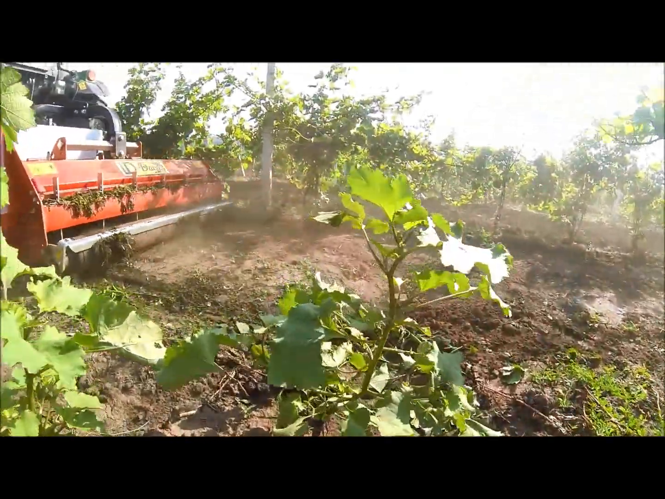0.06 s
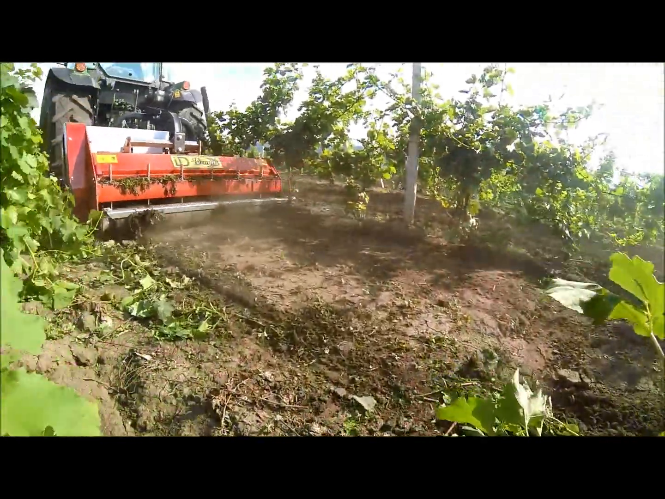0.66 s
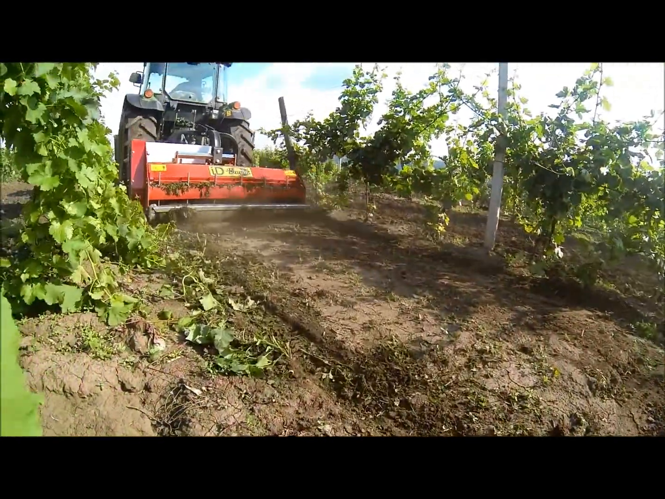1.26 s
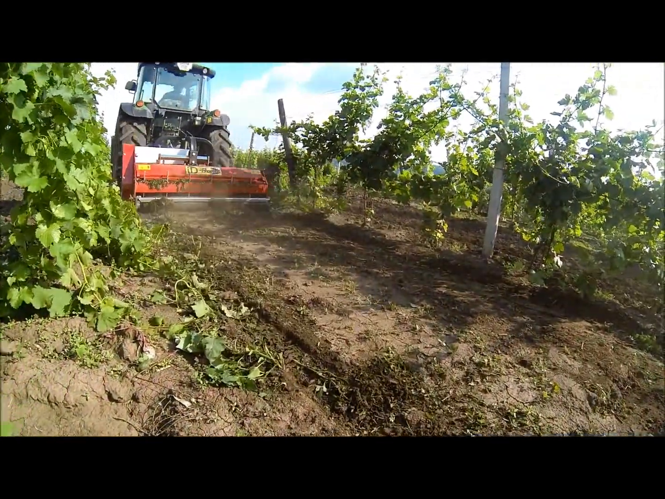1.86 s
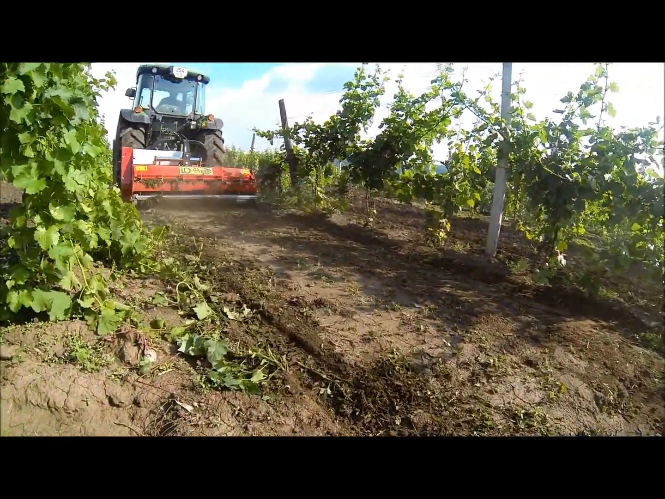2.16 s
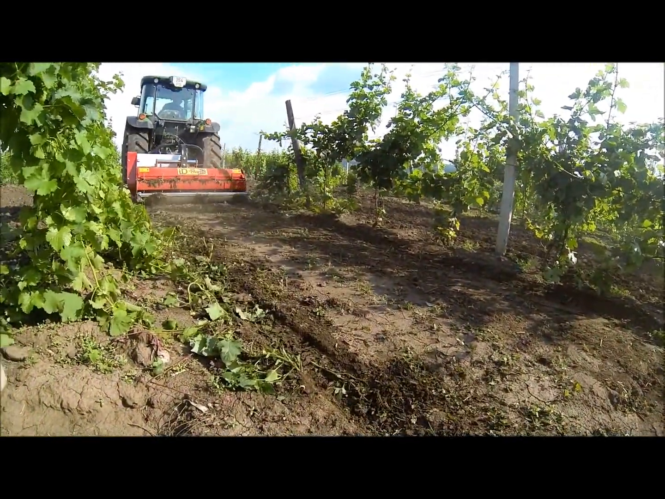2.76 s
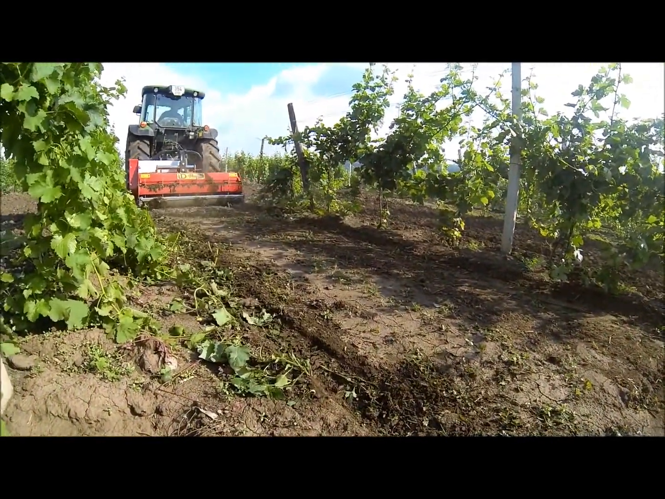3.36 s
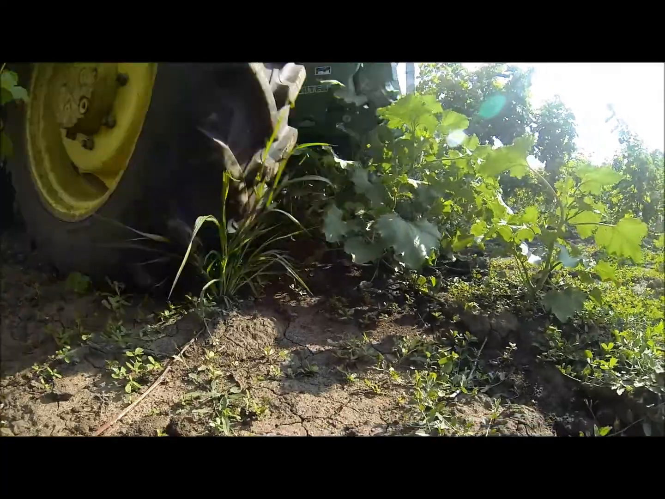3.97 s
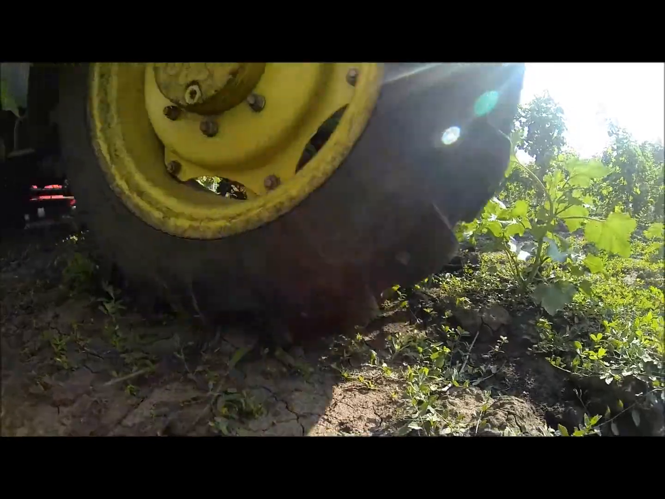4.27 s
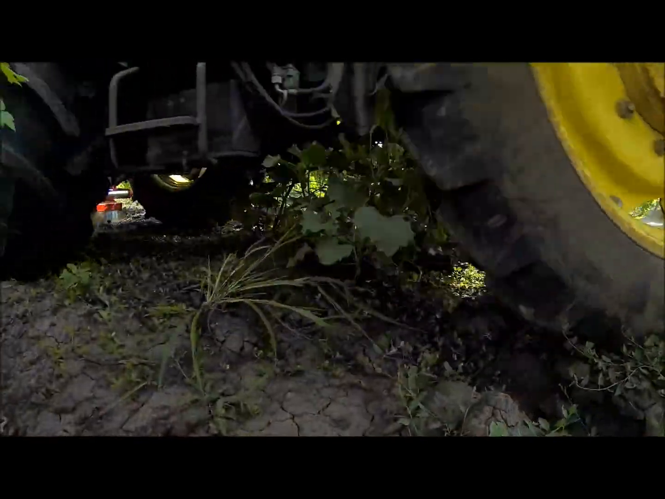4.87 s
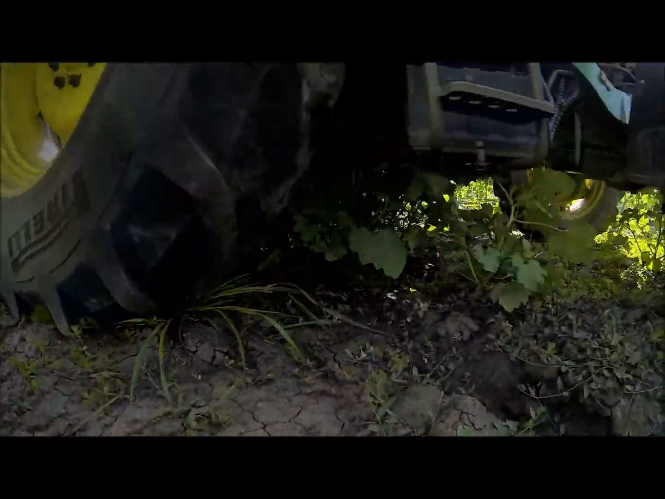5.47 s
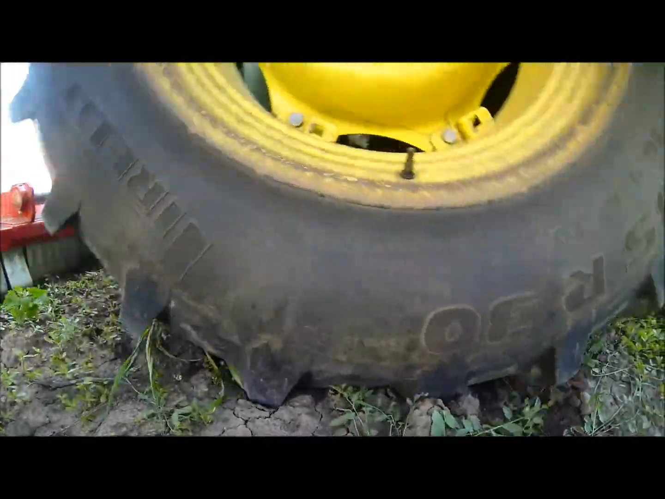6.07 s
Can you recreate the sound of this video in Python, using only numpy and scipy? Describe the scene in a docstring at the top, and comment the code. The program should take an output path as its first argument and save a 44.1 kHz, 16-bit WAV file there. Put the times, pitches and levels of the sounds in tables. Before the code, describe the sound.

A tractor-drawn mulcher drones and roars along a vineyard row, shredding stalks with occasional ticks of debris, its pitch sagging as it moves away. Fingers knock and rub on the microphone's case, with one very loud clack. The sound cuts to a second diesel tractor that grows louder and rolls by very close, throbbing and rattling, its tyres crunching dry soil. Light wind rumbles on the microphone throughout.

```python
"""A vineyard row. A tractor drags a flail mulcher away: the rotor drones and sags under load, gears
whine, stalks are shredded under a ringing steel hood. Fingers knock and rub the cased camera, and the
sound cuts to a second diesel tractor, which rolls past at arm's length, throbbing and rattling, its
tyres crunching dry soil. A light wind rumbles on the microphone throughout."""
import sys
import numpy as np
from scipy import signal
from scipy.fft import rfft, irfft, next_fast_len
from scipy.io import wavfile
from scipy.ndimage import uniform_filter1d

SR = 44100
rng = np.random.default_rng(int(sys.argv[2]) if len(sys.argv) > 2 else 0)


def bounce(signal):
    """Save signal as a 16-bit WAV file at the path given by the first command-line argument."""
    frames = np.transpose(np.atleast_2d(signal))
    limited = np.clip(frames, -1, 1)
    pcm = np.round(limited * 32767).astype(np.int16)
    wavfile.write(sys.argv[1], SR, pcm)


N = 273861
TIME = np.arange(N) / SR


def from_db(db):
    """Decibels to gain."""
    return 10 ** (np.asarray(db) / 20)


def unit_rms(x):
    """Scale to rms 1."""
    return x / np.sqrt(np.mean(x ** 2) + 1e-20)


def curve(rows):
    """(time, value) rows interpolated at every sample."""
    return np.interp(TIME, *np.transpose(rows))


def drift(knots_per_s):
    """Random wander, rms 1."""
    knots = rng.standard_normal(4096)
    return unit_rms(np.interp(TIME * knots_per_s, np.arange(len(knots)), knots))


def colour(x, spectrum):
    """Minimum-phase filter, -12 dB per octave outside the table; white noise keeps its power."""
    size = next_fast_len(N + SR // 2) // 2 * 2
    hz, db = np.transpose(spectrum)
    octave = np.log2(np.arange(size // 2 + 1) * SR / size + 1)
    outside = abs(octave - np.clip(octave, np.log2(hz[0]), np.log2(hz[-1])))
    gain = unit_rms(from_db(np.interp(octave, np.log2(hz), db) - 12 * outside))
    cepstrum = irfft(np.log(gain))
    cepstrum[1:size // 2] *= 2
    cepstrum[size // 2 + 1:] = 0
    return irfft(rfft(x, size) * np.exp(rfft(cepstrum)))[:N]


def noise(spectrum):
    """Coloured noise, rms about 1."""
    return colour(rng.standard_normal(N), spectrum)


def grains(per_s, spread_db):
    """Random impulses of uneven size, rms 1."""
    signs = (rng.random(N) < per_s / SR) * rng.choice([-1, 1], N)
    return unit_rms(signs * from_db(spread_db * np.minimum(rng.exponential(1, N), 4)))


def tone(cycles, waver_db, waver_per_s):
    """Sine of unsteady level on a cycle count, rms about 1."""
    sine = np.sqrt(2) * np.sin(2 * np.pi * (cycles + rng.random()))
    return sine * from_db(waver_db * drift(waver_per_s))


def rough_tone(hz, roughness):
    """Sine blurred in level and phase, rms 1."""
    blur = np.exp(2j * np.pi * rng.random()) + roughness * (drift(110) + 1j * drift(110))
    return unit_rms(np.real(blur * np.exp(2j * np.pi * np.cumsum(hz) / SR)))


def burst(start_s, t60_s, rise_s):
    """Sample indices, ages in s and envelope (peak 1) of a short contact."""
    start = round(start_s * SR)
    at = np.arange(start, min(start + SR // 5, N))
    age_s = (at - start) / SR
    envelope = (1 - np.exp(-age_s / rise_s)) ** 2 * from_db(-60 * age_s / t60_s)
    return at, age_s, envelope / envelope.max()


def band(x, hz, width_hz):
    """One resonant band of x."""
    return signal.lfilter(*signal.iirpeak(hz, hz / width_hz, fs=SR), x)


def resonate(x, modes):
    """Boost or cut a band at each mode."""
    for hz, width_hz, boost_db in modes:
        x = x + (from_db(boost_db) - 1) * band(x, hz, width_hz)
    return x


def mode_gain(hz, modes):
    """Response of metal with these modes to a tone at hz."""
    return sum(from_db(db) / (1 + ((hz - mode_hz) / half_hz) ** 2) for mode_hz, half_hz, db in modes)


def rotor_drone(pass_hz, passes):
    """Flails pump air; the fundamental weakens as the rotor slows, its octave stays level."""
    drone_db = -34.5 + 28 * np.log2(pass_hz / pass_hz[0])
    fundamental = from_db(drone_db) * tone(passes, waver_db=.94, waver_per_s=22)
    return fundamental + from_db(-54) * tone(2 * passes, waver_db=0, waver_per_s=12)


# Gearbox modes: (frequency [Hz], half width [Hz], level [dB])
GEARBOX_MODES = [(2160, 75, -51), (1875, 25, -62), (1725, 60, -51)]
def gear_whine(pass_hz, teeth_per_pass=15.62):
    """The falling mesh tone sweeps through the gearbox modes."""
    mesh_hz = teeth_per_pass * pass_hz
    return mode_gain(mesh_hz, GEARBOX_MODES) * rough_tone(mesh_hz, roughness=1.1)


# Twig and engine hiss: (frequency [Hz], relative density [dB])
HISS_SPECTRUM = [(2000, 1), (4500, 10.5), (6600, 6), (7700, -2.5), (10000, -7), (12000, -4.5), (15500, -15)]
def twigs(decay_s=.0056):
    """Twigs snap at random in bright spits, rms 1."""
    breaks = abs(grains(per_s=9.8, spread_db=2)) + 1e-18
    envelope = signal.lfilter([1], [1, -np.exp(-1 / (decay_s * SR))], breaks)
    return unit_rms(colour(envelope * rng.standard_normal(N), HISS_SPECTRUM))


# Weeds meeting the flails: (time [s], level [dB])
WEED_FEED = [(0.0, -45.5), (0.6, -42), (0.86, -50), (0.88, -46.5), (1.0, -48.5), (1.11, -45.5), (1.49, -46),
             (1.6, -49), (2.71, -53), (2.79, -62), (2.81, -48.5), (2.82, -59), (2.84, -52.5), (3.0, -54)]
# Breaking stalks: (frequency [Hz], relative density [dB])
STALK_SPECTRUM = [(800, -2), (2000, -6.5), (3000, 1.5), (3900, 3), (4600, 0.5), (5300, -8.5), (7000, -11),
                  (8200, -12.5), (10000, -16), (13000, -16), (15500, -25)]
def shredding(pulse):
    """Stalks fracture in time with the flails, growing fainter up to the cut."""
    feed_db = curve(WEED_FEED) - 36 * np.maximum(TIME - 3.5, 0)
    stalk_gain = from_db(feed_db - 2.5 + 2 * drift(90))
    stalks = colour(pulse * grains(per_s=12000, spread_db=3), STALK_SPECTRUM)
    return stalk_gain * stalks + from_db(feed_db - 16) * twigs()


# Hood panel modes: (frequency [Hz], half width [Hz], level re roar [dB])
PANEL_MODES = [(540, 20, -17), (1090, 30, -15), (1215, 30, -12), (1310, 15, -13), (1605, 14, -13),
               (1722, 10, -3.5), (1905, 50, -10.5)]
# Rotor overtones: (multiple of the pass rate)
PANEL_ORDERS = (4, 8, 9, 10, 11, 12, 14)
def hood_panels(pass_hz):
    """Sheet metal sings as rotor overtones sweep through its modes."""
    return sum(mode_gain(order * pass_hz, PANEL_MODES) * rough_tone(order * pass_hz, roughness=.55)
               for order in PANEL_ORDERS)


# Rotor sag: (time [s], flail pass rate [Hz])
PASS_RATE = [(0, 146.4), (.5, 141), (.92, 135.3), (1.35, 134.7), (3.5, 105.5)]
# Machine roar: (frequency [Hz], relative density [dB])
ROAR_SPECTRUM = [(60, 19.5), (150, 7.5), (260, 7), (400, 1.5), (750, -14.5), (1100, -7), (1400, -2.5),
                 (1900, 2), (2350, -14), (3000, -15), (4000, -12.5), (7000, -44.5)]
# Steel hood: (frequency [Hz], width [Hz], boost [dB])
HOOD_MODES = [(547, 83, 4), (1070, 230, 7.5), (1273, 120, -7), (1790, 55, -2), (2180, 110, -1.5),
              (2394, 174, 5.5), (2980, 470, 6.5), (3900, 710, -8), (5330, 370, -7), (5640, 530, 4.5),
              (7020, 490, 5.5)]
def mulcher(start_m=3.54, away_m_per_s=1.66):
    """The loaded rotor roars and shreds under its hood; the roar fades with distance."""
    pass_hz = curve(PASS_RATE)
    passes = np.cumsum(pass_hz * (1 + .0034 * drift(12.4))) / SR
    tones = rotor_drone(pass_hz, passes) + gear_whine(pass_hz)
    pulse = unit_rms(1 + .13 * np.cos(2 * np.pi * passes))
    roar_db = -35.5 - 13 * np.log2(1 + away_m_per_s * TIME / start_m)
    roar = from_db(roar_db + 1.74 * drift(40)) * colour(pulse * rng.standard_normal(N), ROAR_SPECTRUM)
    under_hood = resonate(roar + shredding(pulse), HOOD_MODES)
    return tones + under_hood + from_db(roar_db) * hood_panels(pass_hz)


# Wind: (frequency [Hz], relative density [dB])
WIND_SPECTRUM = [(7, 3), (14, 2), (24, -8), (36, -14), (55, -17), (100, -23), (200, -37), (600, -60)]
def wind():
    """Light wind rumbles on the microphone."""
    return noise(WIND_SPECTRUM)


# Stones and stalks hit by the flails: (time [s], level [dB], ring [Hz])
DEBRIS_HITS = [(.435, -28, 1900), (.945, -38, 11500), (1.352, -25, 3150), (1.873, -34, 3400),
               (2.218, -32, 2900), (2.805, -40, 5200), (3.135, -39, 4700), (3.208, -35, 2700)]
def debris():
    """Hard bits tick against the hood: three close modes and a spit of shredded matter."""
    rings, spits = np.zeros(N), np.zeros(N)
    for start_s, db, hz in DEBRIS_HITS:
        at, age_s, envelope = burst(start_s, t60_s=.022, rise_s=.0005)
        modes = [np.sin(2 * np.pi * (hz * ratio * age_s + rng.random())) for ratio in (.89, 1, 1.13)]
        rings[at] += from_db(db - 3) * envelope * np.mean(modes, axis=0)
        spits[at] += from_db(db - 12) * envelope * rng.standard_normal(len(at))
    return rings + colour(spits, STALK_SPECTRUM)


# Finger taps: (time [s], ring level [dB], ring [Hz], crack level [dB], thud level [dB])
KNOCKS = [(2.482, -31, 455, -48, -45), (2.898, -50, 500, -37, -28), (3.109, -29, 451, -36, -34.5),
          (3.248, -35, 1280, -35, -36.5), (3.4265, -18, 1130, -25, -18), (3.458, -35, 2300, -20, -22),
          (3.484, -18.5, 2300, -16, -15), (3.594, -25.5, 1390, -42, -26.5), (3.656, -10.5, 1650, -6, -17),
          (3.695, -22, 1010, -43, -14), (3.712, -21, 2200, -38, -22), (3.7334, -10, 1200, -3.5, -25),
          (3.7449, 6.5, 1389, 7.5, -15.5), (3.762, -15, 1570, -15, -42), (4.059, -18.5, 1500, -24, -32),
          (4.169, -27, 1830, -40, -45), (4.19, -14.5, 1480, -29, -26), (4.195, -10.5, 1800, -21.5, -20.5),
          (4.271, -17, 1470, -32, -25.5)]
# Low modes of the held case: (frequency [Hz], level re thud [dB], t60 [s])
THUD_MODES = [(130, -5.5, 0.019), (313, 1, 0.015), (437, 4.5, 0.004)]
# Contact crack: (frequency [Hz], relative density [dB])
CRACK_SPECTRUM = [(200, -6), (500, -20), (780, -9), (1300, 13.5), (2600, 5.5), (3300, 1), (4100, 0.5),
                  (4800, -12.5), (5600, -11), (6500, -10.5), (8500, -41), (12000, -32), (15000, -37)]
def case_knocks():
    """Fingers tap the case: a damped two-mode ring, a dull thud and a crack."""
    rings, cracks = np.zeros(N), np.zeros(N)
    for start_s, ring_db, hz, crack_db, thud_db in KNOCKS:
        at, age_s, envelope = burst(start_s, t60_s=.0075, rise_s=.001)
        phase_per_hz = 2 * np.pi * age_s
        modes = np.sin(hz * phase_per_hz) + from_db(-15) * np.sin(1.58 * hz * phase_per_hz)
        # The clack's ring swells briefly, keeping it near its pitch.
        rings[at] += from_db(ring_db) * envelope ** 1.5 * modes
        for mode_hz, mode_db, t60_s in THUD_MODES:
            rings[at] += from_db(thud_db + mode_db - 60 * age_s / t60_s) * np.sin(mode_hz * phase_per_hz)
        at, _, envelope = burst(start_s, t60_s=.0093, rise_s=.00035)
        cracks[at] += from_db(crack_db - 6.5) * envelope * rng.standard_normal(len(at))
    return rings + colour(cracks, CRACK_SPECTRUM)


# New holds on the case: (start [s], end [s], pressure level [dB], final rub level [dB])
GRIPS = [(3.386, 3.542, -20.5, -35.5), (3.623, 3.751, -18, -26)]
# Hand pressure and rubbing: (frequency [Hz], relative density [dB])
PRESS_SPECTRUM = [(12, 14), (30, 7), (70, -5), (130, -4), (200, -25), (500, -43), (1500, -61)]
RUB_SPECTRUM = [(150, 9), (350, 12), (750, -0.5), (1500, 11), (2400, 0), (3500, -7.5), (5300, -19),
                (6600, -23), (8500, -30), (15000, -38)]
def hand_grips(rise_db_per_s=130, release_s=.018):
    """Pressure swells and eases; rubbing grows until the fingers let go."""
    press, rub = 0, 0
    for start_s, end_s, press_db, rub_db in GRIPS:
        progress = np.clip((TIME - start_s) / (end_s - start_s), 0, 1)
        press += from_db(press_db) * np.sin(np.pi * progress)
        held = np.clip(1 - (TIME - end_s) / release_s, 0, 1)
        rub += held * from_db(rub_db - rise_db_per_s * np.maximum(end_s - TIME, 0))
    return press * noise(PRESS_SPECTRUM) + rub * noise(RUB_SPECTRUM)


def approach(alongside_db, db_per_doubling, arrival_s=4.85, m_per_s=3.3, gap_m=.78):
    """Gain as the second tractor rolls up; its long flank then stays alongside."""
    distance_m = np.hypot(gap_m, m_per_s * np.maximum(arrival_s - TIME, 0))
    return from_db(alongside_db - db_per_doubling * np.log2(distance_m / gap_m))


# Implement and gears: (frequency [Hz], level re exhaust [dB], slope [dB/s])
DRIVE_TONES = [(72.3, -13, 1), (144.6, -8, 1), (435, -21, 8), (597, -19, 1), (1071, -21, -1),
               (1303, -24, 0), (2256, -27, 0), (2785, -27, -2)]
def drive_gears():
    """Wavering drive tones shift in balance as the tractor's rear comes closer."""
    ramp_s = np.clip(TIME - 5.4, -1, 1)
    gears = np.zeros(N)
    for hz, db, db_per_s in DRIVE_TONES:
        cycles = np.cumsum(hz * (1 + .00239 * drift(20))) / SR
        gears += from_db(db + db_per_s * ramp_s) * tone(cycles, waver_db=2, waver_per_s=12)
    return gears


# Loose covers and linkage: (frequency [Hz], width [Hz], relative level [dB])
RATTLE_MODES = [(1090, 33, -14), (1584, 140, -14.5), (2000, 36, -14.5), (2535, 160, -13.5),
                (2910, 126, -13.5), (3490, 180, -17.5)]
def rattle():
    """Loose parts touch at random and ring briefly."""
    return sum(from_db(db) * unit_rms(band(grains(per_s=260, spread_db=2.5) + 1e-18, hz, width_hz))
               for hz, width_hz, db in RATTLE_MODES)


# Exhaust: (multiple of the firing rate, relative level [dB])
EXHAUST_ORDERS = [(1, -2), (1.75, -14), (2, -1.5), (2.75, -19.5), (3, -10), (4, -19), (5, -20.5),
                  (5.5, -26.5), (6, -23.5), (7.5, -32), (8.5, -21)]
# Engine block: (frequency [Hz], relative density [dB])
CLATTER_SPECTRUM = [(40, 14), (100, 11), (220, 6.5), (400, 4.5), (780, 2.5), (1150, 5), (1700, 2),
                    (2300, 1), (3000, -2.5), (4000, -9), (5300, -36), (8000, -31.5)]
def diesel_tractor(firing_hz=64.7, cylinders=4):
    """Firings drive exhaust tones, block clatter and hiss; gears and loose parts join in."""
    firings = np.cumsum(firing_hz * (1 + .0012 * drift(8))) / SR
    exhaust = sum(from_db(db) * tone(order * firings, waver_db=.8, waver_per_s=10)
                  for order, db in EXHAUST_ORDERS)
    gears = drive_gears()
    cycle = firings / cylinders % 1
    # Valves and injectors repeat each cycle; combustion adds fresh noise.
    pattern = rng.standard_normal(round(cylinders * SR / firing_hz))
    valves = pattern[(cycle * len(pattern)).astype(int)]
    pulse = 1 + .12 * np.cos(2 * np.pi * firings) + .026 * np.cos(2 * np.pi * cycle)
    throb = unit_rms(pulse + .16 * drift(50))
    clatter = colour(throb * unit_rms(valves + rng.standard_normal(N)), CLATTER_SPECTRUM)
    hiss = colour(throb * grains(per_s=24000, spread_db=3), HISS_SPECTRUM)
    return (approach(-28.5, db_per_doubling=6) * (exhaust + gears)
            + approach(-33.5, db_per_doubling=5.14) * clatter
            + approach(-32.5, db_per_doubling=9.9) * rattle()
            + approach(-50, db_per_doubling=7.9) * hiss)


# Crushed clods: (time [s], level [dB], length [s], stem snap level [dB])
CLODS = [(4.811, -36, 0.022, -39), (5.814, -30.5, 0.014, -30), (5.969, -31, 0.041, -28),
         (6.137, -22, 0.033, -39), (6.177, -28.5, 0.075, -31)]
# Dry soil: (frequency [Hz], relative density [dB])
SOIL_SPECTRUM = [(200, -1), (700, 4), (1100, 0), (1500, 8.5), (2100, 0.5), (3300, -3), (5300, -20),
                 (6700, -10.5), (8000, -24), (15000, -37)]
def tyres(snap_delay_s=.0074):
    """Lugs crush clods in sprays of small fractures; a dry stem snaps as each gives way."""
    force, snaps = np.zeros(N), np.zeros(N)
    for start_s, db, length_s, snap_db in CLODS:
        knots_s = [0, .003, length_s, 1.38 * length_s]
        force += from_db(db) * np.interp(TIME - start_s, knots_s, [.01, .81, .85, .083])
        at, _, envelope = burst(start_s + snap_delay_s, t60_s=.018, rise_s=.00029)
        snaps[at] += from_db(snap_db) * envelope * rng.standard_normal(len(at))
    soil = colour(force * grains(per_s=4400, spread_db=3), SOIL_SPECTRUM)
    return soil + colour(snaps, STALK_SPECTRUM)


def scene(cut_start_s=3.514, cut_end_s=3.549, fade_s=.004):
    """Departing mulcher, a moment of faint air alone, then the passing tractor."""
    before_cut = np.clip((cut_start_s - TIME) / fade_s, 0, 1)
    after_cut = np.clip((TIME - cut_end_s) / fade_s, 0, 1)
    rumble = wind()
    hand = case_knocks() + hand_grips()
    departing = mulcher() + debris() + from_db(-32.5) * rumble + hand
    passing = diesel_tractor() + tyres() + from_db(-33) * rumble + hand
    air = from_db(-69) * noise(ROAR_SPECTRUM)
    return (before_cut * departing + after_cut * passing + air)[None]


def gain_control(x, threshold_db=-13, attack_s=.025, recover_db_per_s=13, sense_above_hz=500):
    """A loud knock pushes the gain down; it creeps back at a steady rate."""
    sensed = signal.sosfilt(signal.butter(2, sense_above_hz, "high", fs=SR, output="sos"), x)
    level_db = 10 * np.log10(np.abs(uniform_filter1d(sensed ** 2, size=220)) + 1e-12)
    creep_db = recover_db_per_s * TIME
    duck_db = np.maximum.accumulate(np.maximum(level_db - threshold_db, 0) + creep_db) - creep_db
    pole = np.exp(-1 / (attack_s * SR))
    return x * from_db(-signal.lfilter([1 - pole], [1, -pole], duck_db))


# Air cavities of the case: (frequency [Hz], width [Hz], boost [dB])
CASE_MODES = [(1020, 91, 0), (4577, 300, 5), (6530, 480, 3.5), (9620, 830, 7), (11500, 410, 2.5),
              (13400, 500, 1)]
def record(dry, cutoff_hz=15300):
    """The case rings in the treble, the loudest knock overloads and ducks the gain, the top is cut."""
    limited = gain_control(np.tanh(resonate(dry[0], CASE_MODES)))
    return signal.sosfilt(signal.ellip(12, .1, 90, cutoff_hz, fs=SR, output="sos"), limited)[None]


dry = scene()
out = record(dry)
bounce(out)
```